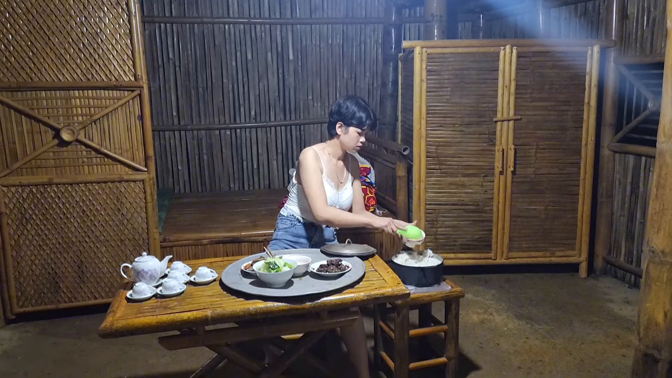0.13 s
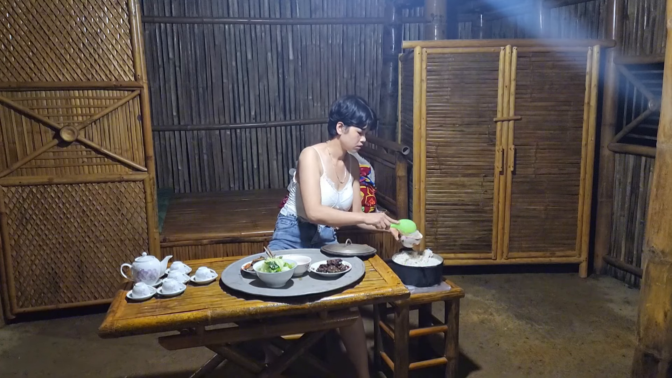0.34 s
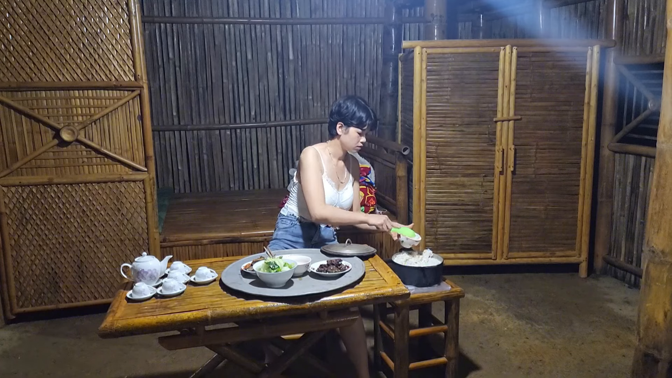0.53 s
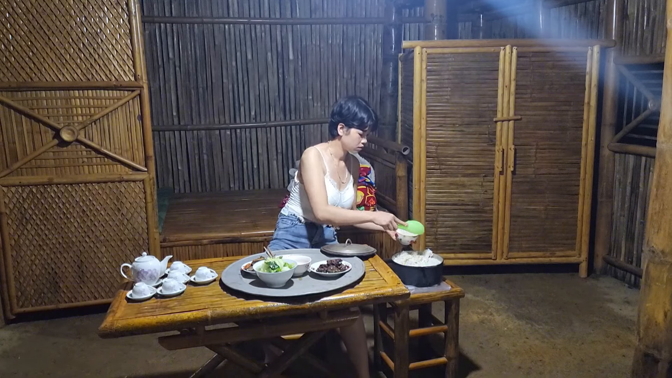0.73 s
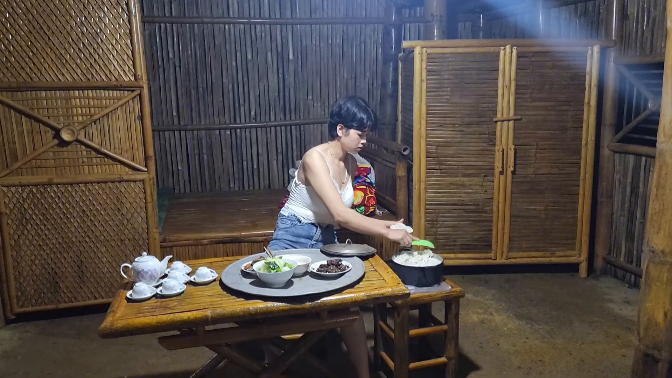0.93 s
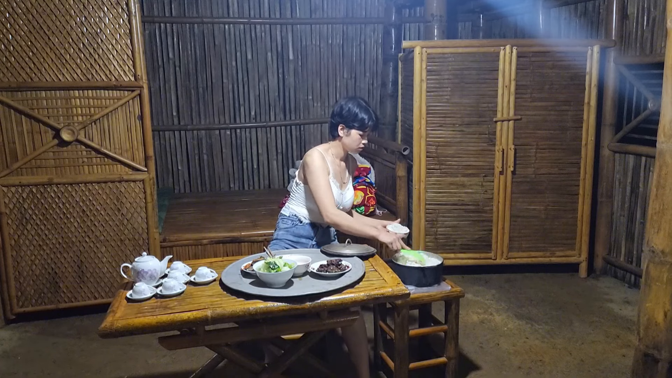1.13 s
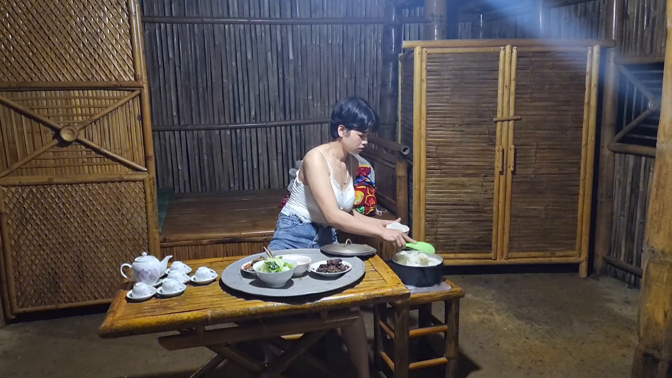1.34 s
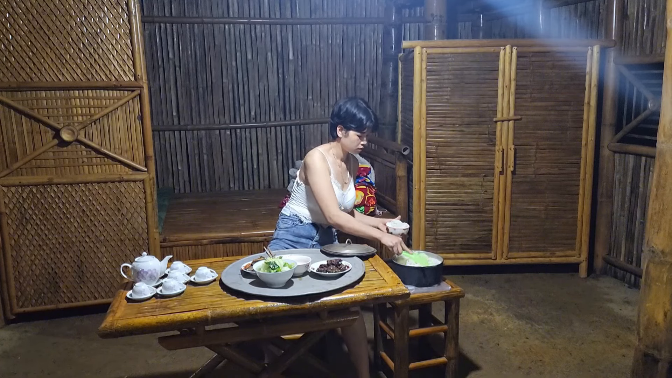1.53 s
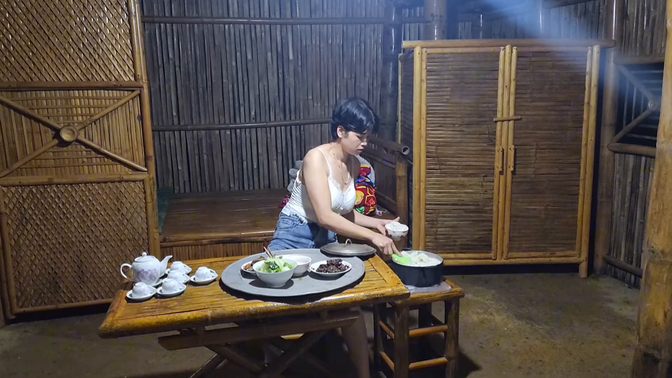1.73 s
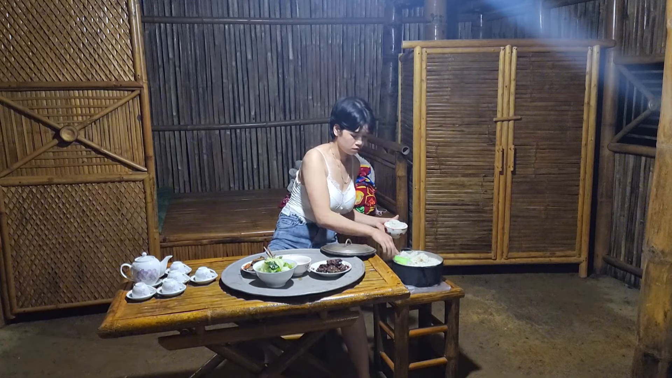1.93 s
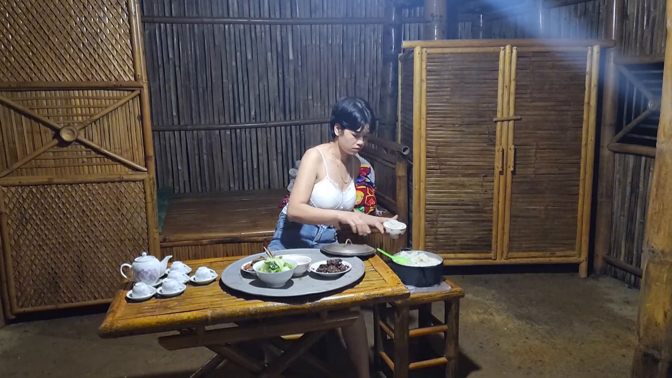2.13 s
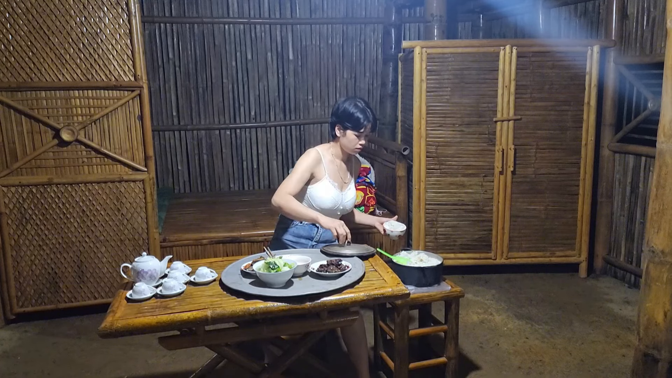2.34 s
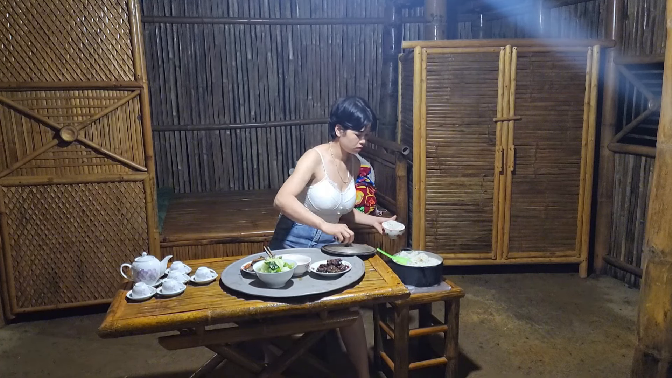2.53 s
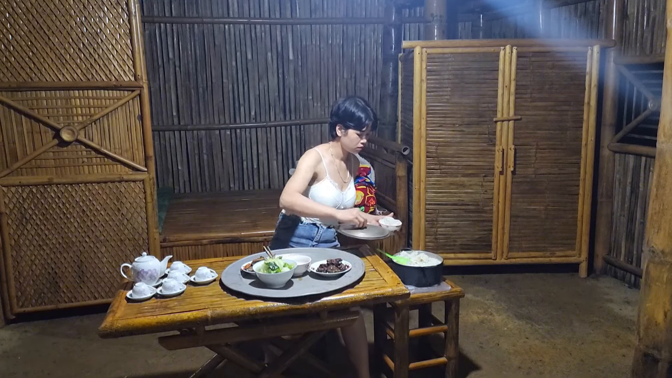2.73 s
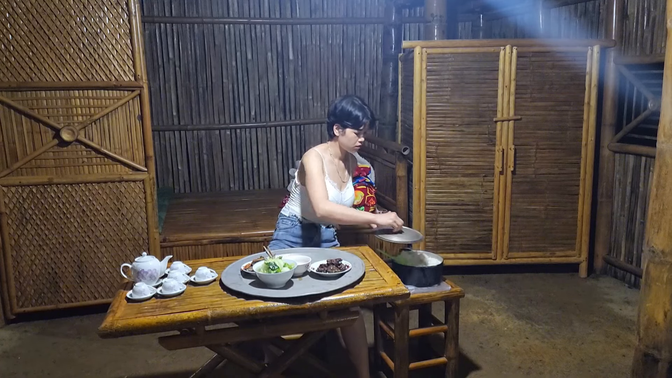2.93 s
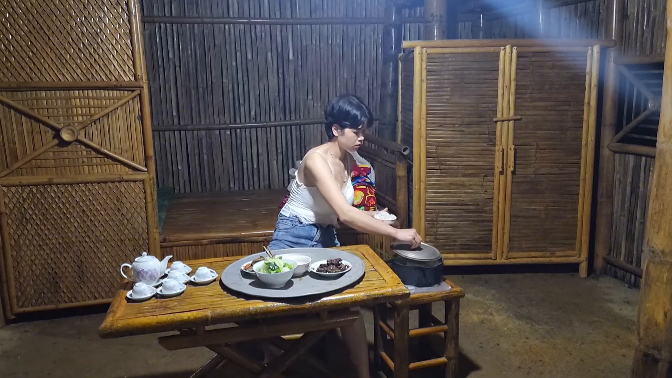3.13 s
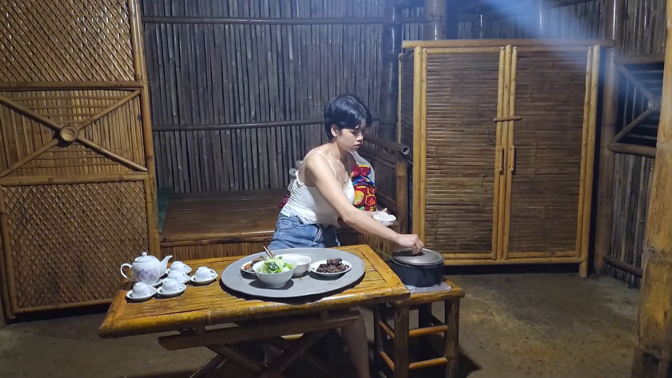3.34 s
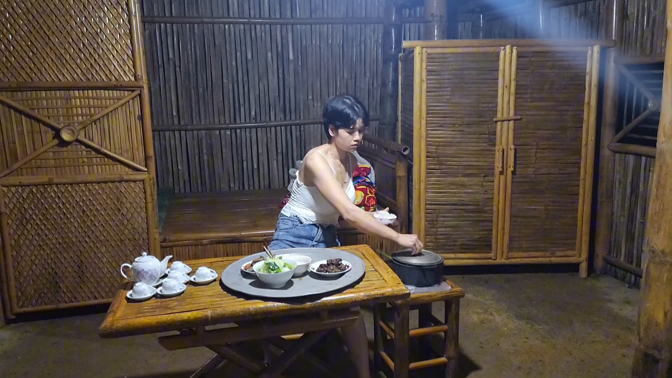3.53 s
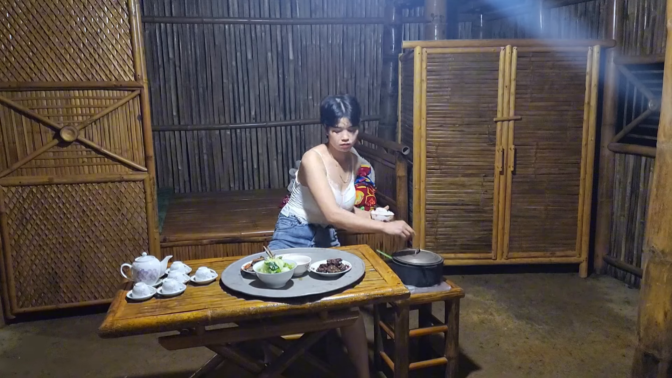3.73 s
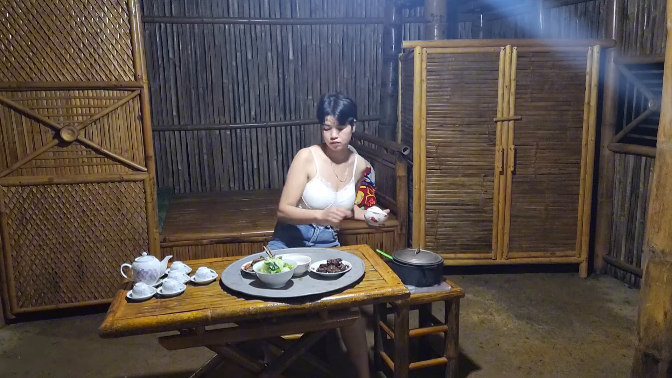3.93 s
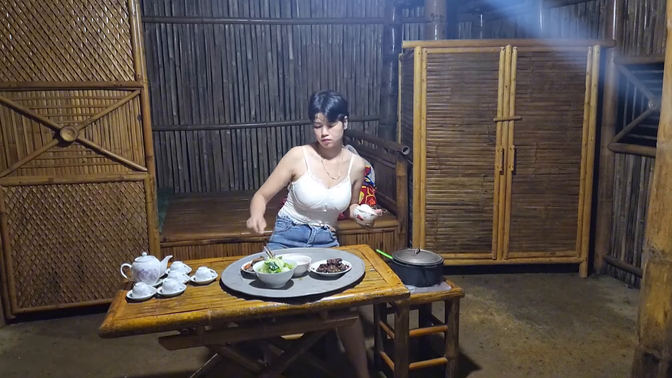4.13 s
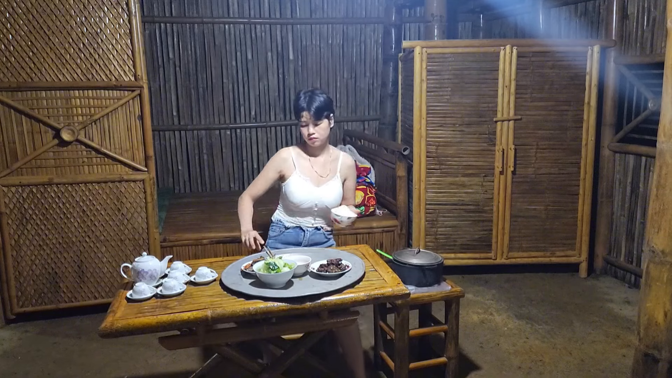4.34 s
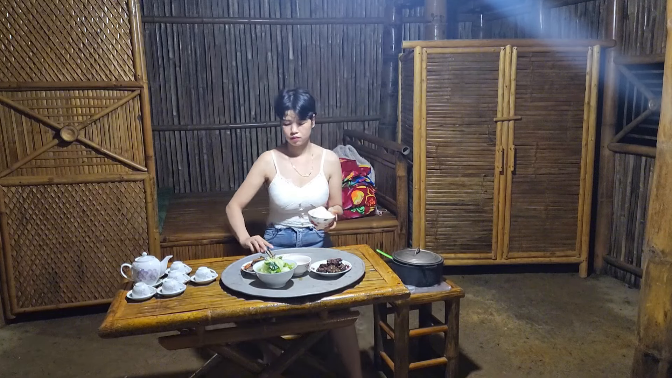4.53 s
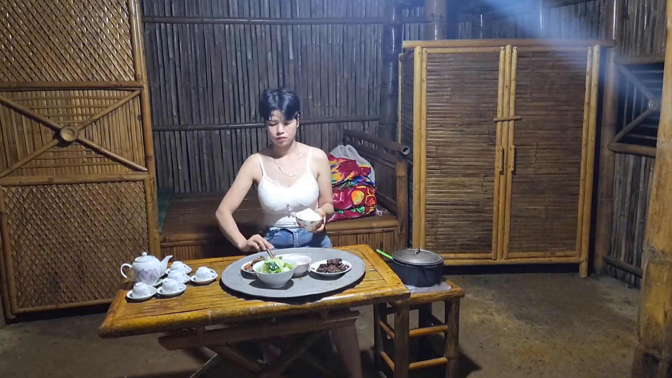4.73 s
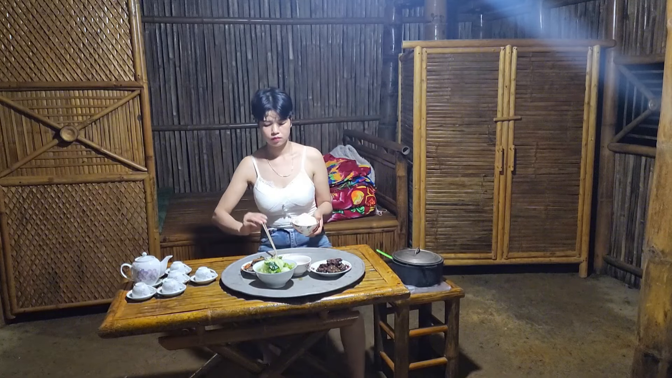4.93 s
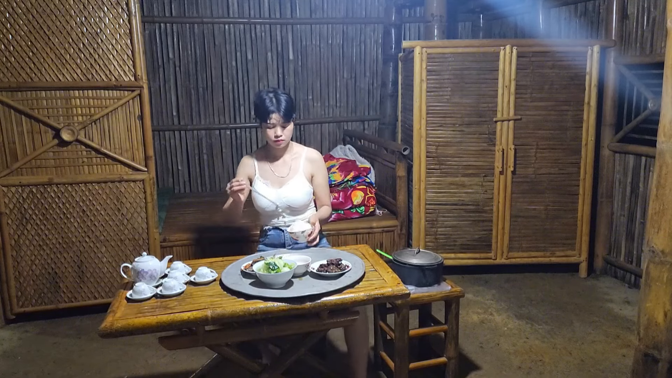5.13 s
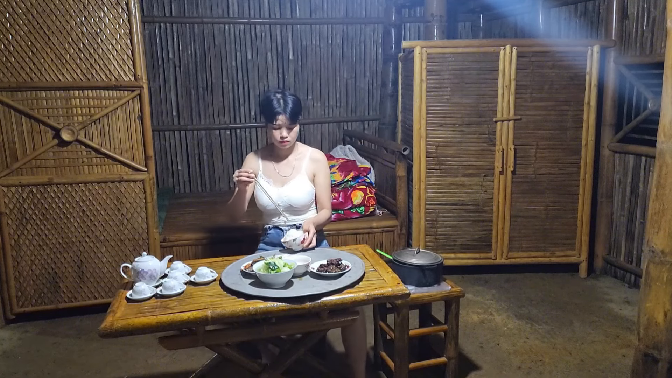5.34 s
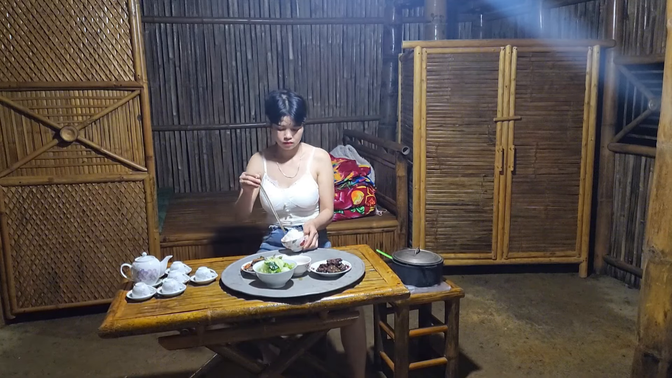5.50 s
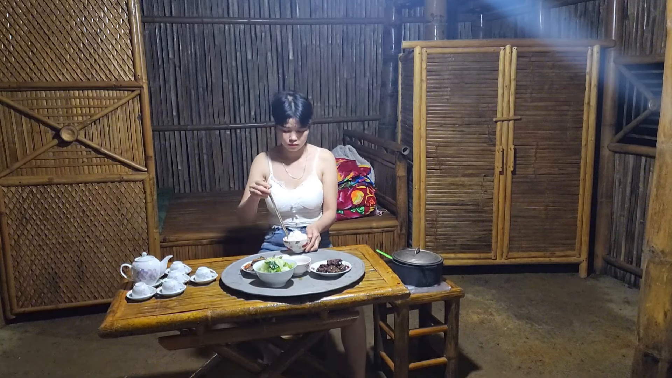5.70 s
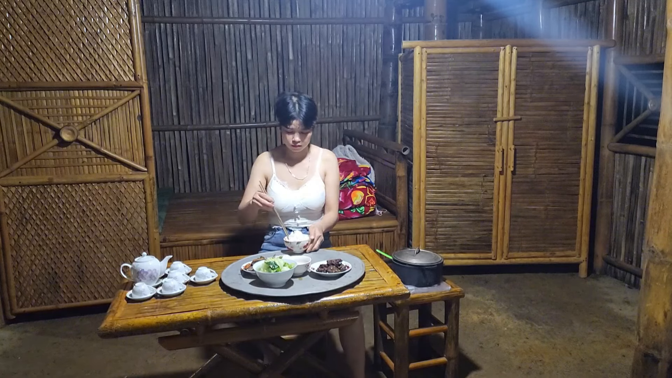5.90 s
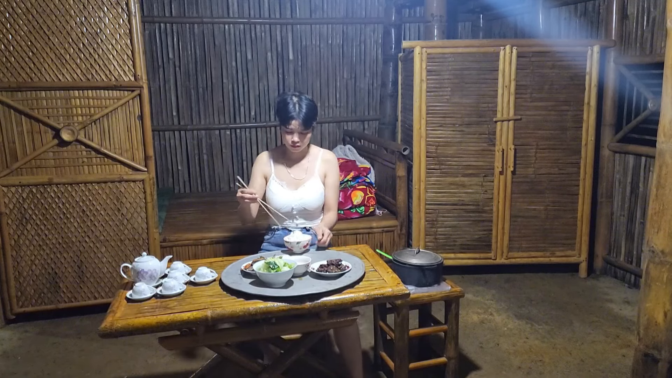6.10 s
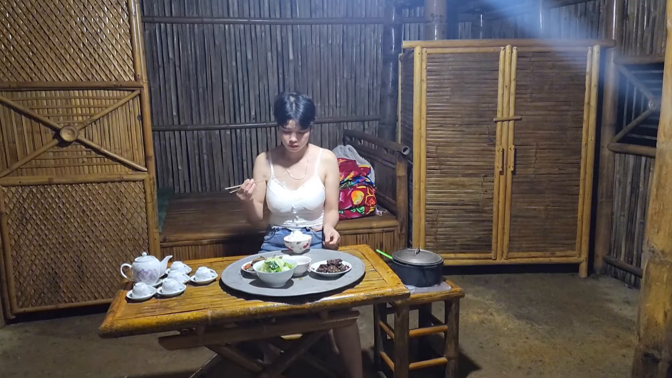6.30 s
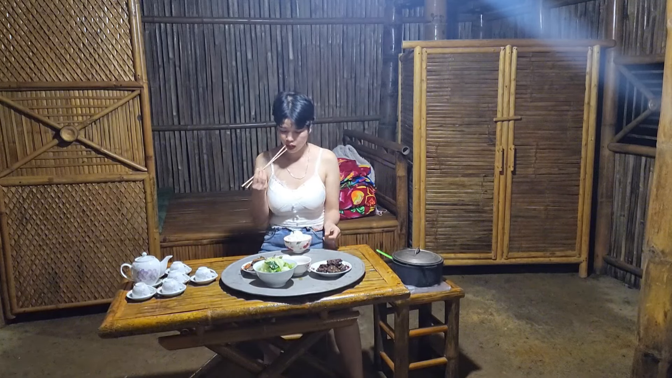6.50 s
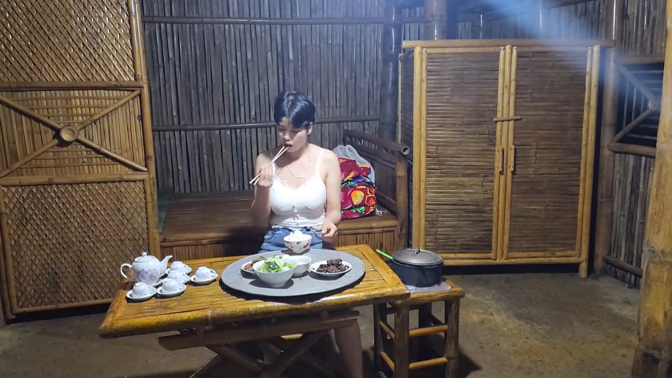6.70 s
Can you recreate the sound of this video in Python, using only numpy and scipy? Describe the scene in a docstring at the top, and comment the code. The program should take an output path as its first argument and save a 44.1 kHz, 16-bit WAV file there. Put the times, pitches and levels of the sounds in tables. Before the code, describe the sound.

A quiet meal in a slatted hut at night, heard in stereo from across the room with a short, dense echo. Continuous pulsing crickets, slightly to the right, and a thin insect chorus lie over soft air noise. Small bowl taps and a pot knock come first, then a chattering metal lid and its bright double clang, the loudest event. Chopsticks rustle and click against china, and finally a dish bumps the tray with a low ring.

```python
"""Night in a bamboo hut: crickets chirp outside over a steady chorus of trilling insects and soft air noise.
A paddle taps a bowl and knocks on a rice pot; the metal lid is dragged off the table, swung and set on the pot.
A soft bump on the bench follows, chopsticks are picked up, and a dish is bumped on the serving tray.
Wing strokes are short gliding tones, contacts are filtered noise bursts with decaying modes, and scrapes
are clumped noise. The hut's short, dense echo is noise that decays band by band."""
import sys
import numpy as np
from scipy import signal
from scipy.fft import rfft, irfft
from scipy.io import wavfile
from scipy.ndimage import uniform_filter1d

SR = 44100
rng = np.random.default_rng(int(sys.argv[2]) if len(sys.argv) > 2 else 0)


def transcribe(u):
    """Save the signal u as a 16-bit wav file named by the first command-line argument.

    u: samples, shape (n,) or (channels, n), limited to [-1, 1]; the rate is SR.
    q: integer samples, one column per channel.
    """
    v = np.clip(np.atleast_2d(u).T, -1, 1)
    q = np.round(v * 32767).astype(np.int16)
    wavfile.write(sys.argv[1], SR, q)


N = 302526

# Correlation of the two microphones. Each row: frequency in Hz, correlation from -1 to 1.
LIKENESS = [(25, 0.031), (70, 1), (300, 0.8), (700, 0.22), (1400, 0)]
# Reverberation of the hut. Each row: frequency in Hz, 60 dB decay time in seconds.
HUT_DECAY = [(150, 0.31), (400, 0.29), (1000, 0.28), (2800, 0.31), (7000, 0.29), (14000, 0.21)]
# Modes of the china bowl. Each row: frequency in Hz, relative level in dB, 60 dB decay time in seconds.
BOWL_MODES = [(1320, -8, .14), (1949, 0, .29), (2169, -5, .22), (2540, -12, .2)]
# Modes of the pot struck on its rim. Each row: frequency in Hz, relative level in dB, 60 dB decay time in seconds.
POT_MODES = [(571, -10, .25), (611, -11, .25), (665, -12, .25), (1180, -13, .17), (1289, -13, .17),
             (1909, -8, .2), (1995, -8, .2), (2076, -8, .3), (2705, -6, .3), (3085, -7, .27),
             (3680, -12, .15), (3890, -10, .15), (4340, -1, .2), (4360, 0, .23), (4590, -10, .17),
             (5110, -11, .17), (5385, -8, .22), (5520, -9, .17), (6250, -9, .2), (6915, -11, .22),
             (7380, -10, .23), (7529, -12, .2), (8870, -12, .2), (10540, -25, .25), (11930, -25, .17)]
# Modes of the lid held free. Each row: frequency in Hz, relative level in dB, 60 dB decay time in seconds.
FREE_LID_MODES = [(1680, -1, 0.28), (1774, 9, 0.065), (4080, -7.5, .2), (5700, -9, 0.21),
                  (7380, -7.5, 0.17), (11260, -24, 0.17)]


def amp(db):
    """Level and amplitude: decibels become a linear gain."""
    return 10 ** (np.asarray(db) / 20)


def evened(x):
    """Normalization: the signal is scaled to an rms of one."""
    return x / np.sqrt(np.mean(x ** 2) + 1e-20)


def read(points, hz):
    """Interpolation on a logarithmic frequency axis."""
    f, value = np.transpose(points)
    return np.interp(np.log(hz + 1), np.log(f + 1), value)


def add(mix, s, sound):
    """Superposition: a sound is summed into the mix from time s in seconds, cut at the mix's ends."""
    start = round(s * SR)
    sound = sound[..., max(-start, 0):]
    part = mix[..., max(start, 0):][..., :sound.shape[-1]]
    part += sound[..., :part.shape[-1]]


def panned(db):
    """Intensity stereo: left-minus-right decibels are split into a pair of gains."""
    return amp([[db / 2], [-db / 2]])


def paired(x):
    """Spatial coherence: two unrelated signals are mixed to the microphones' correlation at each frequency."""
    z = rfft(x)
    correlation = np.clip(read(LIKENESS, np.fft.rfftfreq(x.shape[1], 1 / SR)), -1, 1)
    angle = np.arcsin(correlation) / 2
    return irfft(np.cos(angle) * z + np.sin(angle) * z[::-1], x.shape[1])


def wander(rate_hz):
    """Slow random modulation: Gaussian low-passed noise of rms one."""
    hz = np.fft.rfftfreq(N, 1 / SR)
    spectrum = rfft(rng.standard_normal(N)) * np.exp(-(hz / rate_hz) ** 2)
    return evened(irfft(spectrum, N))


def bass_share(hz, bass_hz=550):
    """Contact mass: the weight of a bass boost falls from one towards zero with frequency."""
    return 1 / (1 + (hz / bass_hz) ** 4)


def nearness(modes, hz, width_hz=45, width_share=0.012):
    """Resonance: one on any of the modes, near zero in the valleys between them."""
    centre = np.array(modes)[:, :1]
    return np.exp(-((hz - centre) / (width_hz + width_share * centre)) ** 2).max(0)


def colour(x, spectrum, bass_db, treble_db, modes=None, gather_db=0, treble_hz=3600, size=2048):
    """Minimum-phase filtering: a body's spectrum, raised at its modes, tilted by contact mass and hardness."""
    hz = abs(np.fft.fftfreq(size, 1 / SR))
    treble_share = 1 - 1 / (1 + (hz / treble_hz) ** 4)
    db = read(spectrum, hz) + bass_db * bass_share(hz) + treble_db * treble_share
    if modes is not None:
        db = db + gather_db * nearness(modes, hz)
    # the Hilbert transform of the log magnitude gives the causal phase
    log_response = np.conj(signal.hilbert(np.log(amp(db))))
    impulse_response = np.fft.ifft(np.exp(log_response)).real
    return signal.fftconvolve(x, impulse_response)


def echoes(t60s, direct_db, build_s, lag_s=0):
    """Reverberation: a direct pulse, later at the left by lag_s, then dense reflections dying band by band."""
    count = SR // 2
    # random signs at about 5000 reflections per second
    reflections = rng.choice([-1., 1.], (2, count)) * (rng.random((2, count)) < 5000 / SR)
    hz, t, z = signal.stft(paired(reflections), SR, nperseg=256)
    decay = amp(-60 * t / read(t60s, hz)[:, None])
    tail = signal.istft(z * decay, SR, nperseg=256)[1][:, :count]
    tail = tail * (1 - np.exp(-np.arange(count) / SR / build_s))
    tail /= np.linalg.norm(tail, axis=1, keepdims=True)
    direct = amp(direct_db) * np.hanning(7) / 3  # partly shaded, so without its top treble
    add(tail[0], max(lag_s, 0), direct)
    add(tail[1], max(-lag_s, 0), direct)
    return tail / np.linalg.norm(tail, axis=1, keepdims=True)


def heard(x, response):
    """Linear propagation: the sound is convolved with a stereo impulse response."""
    return signal.fftconvolve(x[None], response, axes=1)[:, :N]


def air(level_db=-62.0, drift_db=1.5):
    """Broadband noise: the soft wash of the still night, its level drifting at random."""
    # Each row: frequency in Hz, relative spectral density in dB.
    air_spectrum = [(25, -8), (60, -17), (100, -12), (135, 0.5), (185, 0.5), (260, -7), (600, -4),
                    (1000, -5.5), (2000, -5), (3400, -10.5), (5000, -20), (7500, -17), (10000, -29),
                    (15500, -34.5)]
    noise = rfft(paired(rng.standard_normal((2, N))))
    gain = amp(read(air_spectrum, np.fft.rfftfreq(N, 1 / SR)))
    wash = evened(irfft(noise * gain, N))
    return wash * amp(level_db + drift_db * wander(9))


def chorus(throb=0.092, drift_db=-1.0):
    """Incoherent summation: many far insects merge into narrow, fluttering bands of noise."""
    # Each row: centre in Hz, nominal width in Hz, level in dB, left-right difference in dB,
    # mean pulses per second.
    trill_bands = [(4220, 430, -68.5, -1, 21), (6030, 880, -71, -1, 50), (6747, 280, -68, -0.5, 94)]
    f, out = np.fft.rfftfreq(N, 1 / SR), np.zeros((2, N))
    for hz, width, db, pan_db, pulse_hz in trill_bands:
        band_gain = 1 / (1 + (0.99 * (f - hz) / width) ** 2) ** 1.5
        band = irfft(rfft(rng.standard_normal((2, N))) * band_gain, N)
        pulse_rate = pulse_hz * (1 + 0.19 * wander(10))
        flutter = 1 + throb * np.sin(2 * np.pi * np.cumsum(pulse_rate) / SR)
        out += evened(band * flutter) * amp(db + drift_db * wander(6.1)) * panned(pan_db)
    return out


def near_bout(count=18):
    """Rhythm of one bout: gaps shrink to the quickest chirp, then widen, while the level grows steadily."""
    start_s, first_gap_s, quickest_gap_s, quickest_chirp = -.039, .2709, .2335, 13
    start_db, growth_db_per_s, length_s = -54.5, 0.5, 0.13
    ease = (1 - np.arange(count - 1) / quickest_chirp) ** 2
    gaps = quickest_gap_s + (first_gap_s - quickest_gap_s) * ease
    times = start_s + np.cumsum([0, *gaps])
    return [(s, start_db + growth_db_per_s * s, length_s) for s in times]


def high_bout(count=11):
    """Periodic rhythm: a higher-pitched neighbour gives long, like chirps on its own slower, even beat."""
    start_s, gap_s, db, length_s = -.155, .377, -56, 0.18
    return [(start_s + k * gap_s, db, length_s) for k in range(count)]


def stray_chirps(length_s=.18):
    """Irregular rhythm: stray chirps from other crickets, as long as the high neighbour's."""
    # Each row: start in seconds, level in dB.
    strays = [(0.491, -62), (0.841, -59.5), (1.621, -57.5), (2.369, -61.5), (4.098, -61.5), (5.555, -60.5),
              (6.445, -56), (6.775, -64)]
    return [(s, db, length_s) for s, db in strays]


def cricket(chirps, start_hz, top_hz, glide_s, pulse_hz, swell, sag_hz, uneven_db=3.0, waver_hz=30):
    """Stridulation: each wing stroke is a short tone of its own strength; strokes climb as the chirp swells."""
    out = np.zeros(N)
    for s, db, length in chirps:
        t = np.arange(0, length, 1 / SR)
        force, tune = rng.standard_normal((2, 20))
        turns = t * pulse_hz * (1 + 0.038 * tune[-1])  # each chirp has its own stroke rate
        which, stroke = turns.astype(int) % len(force), turns % 1
        climb = top_hz + (start_hz - top_hz) * np.exp(-t / glide_s)
        hz = climb + sag_hz * (.5 - stroke) + waver_hz * tune[which]
        arch = np.sin(np.pi * (t / length) ** swell) ** 0.7 * amp(uneven_db * force[which])
        tone = np.sin(2 * np.pi * np.cumsum(hz) / SR)
        add(out, s, amp(db) * evened(arch * np.sin(np.pi * stroke) * tone))
    return out


def crickets():
    """Multipath: chirps come in from the right through the slatted walls, smeared by reflections."""
    near = cricket(near_bout(), start_hz=3765, top_hz=4260, glide_s=0.031, pulse_hz=64.8,
                   swell=0.6, sag_hz=70)
    high = cricket(high_bout(), start_hz=4170, top_hz=4670, glide_s=0.05, pulse_hz=73.8,
                   swell=0.39, sag_hz=110)
    others = cricket(stray_chirps(), start_hz=4160, top_hz=4740, glide_s=0.06, pulse_hz=62,
                     swell=0.64, sag_hz=110)
    out = np.zeros((2, N))
    for voice, direct_db in ((near, 1.5), (high, -6), (others, -6)):
        wet = heard(voice, echoes([(4000, 0.66)], direct_db, build_s=0.00067, lag_s=0.00042))
        out += wet * voice.std() / wet.std(axis=1, keepdims=True)
    return out * amp([[-.9], [.6]])


def bench():
    """Single-mode excitation: a padded contact stirs one low tone of the wood, alike in both microphones."""
    # The row: time of its height in seconds, half length in seconds, pitch in Hz, level in dB.
    bump = (4.158, 0.06, 183.5, -61)
    s, half, hz, db = bump
    out, t = np.zeros(N), np.arange(0, 2 * half, 1 / SR)
    add(out, s - half, amp(db) * np.hanning(len(t)) * np.sin(2 * np.pi * hz * t))
    return out


def rubbing(count, chatter):
    """Stick-slip friction: noise whose strength varies every few ms as two surfaces catch and slip."""
    push, grip = rng.standard_normal((2, count))
    slow_grip = evened(uniform_filter1d(grip, size=80))
    return push * np.exp(chatter * np.tanh(slow_grip))


def scrapes(grit=0.82, chatter=0.88):
    """Sliding friction on wood and china: tiny slips crowd into uneven clumps under each stroke's swell."""
    # Each row: time of the stroke's height in seconds, half length in seconds, level in dB,
    # bass tilt in dB, treble tilt in dB.
    strokes = [(2.889, 0.066, -52, 5, 9.5), (4.682, 0.12, -57, -29, 13.5), (4.858, 0.074, -66.5, 14, 5),
               (5.118, 0.087, -63, 7, -8), (5.213, 0.087, -52.3, -4.5, 0.5)]
    # Each row: frequency in Hz, relative level in dB.
    scrape_spectrum = [(40, -38), (100, -6), (250, -6), (450, 8), (700, -4.5), (1350, 3.5), (2200, 1.5),
                       (3200, -3.5), (4500, -6.5), (7000, -17), (10000, -20), (15000, -24)]
    out = np.zeros(N)
    for s, half, db, bass_db, treble_db in strokes:
        push = rubbing(SR // 2, chatter) * np.exp(grit * rng.standard_normal(SR // 2))
        push = push[:int(2 * half * SR)]
        slips = colour(push * np.hanning(len(push)), scrape_spectrum, bass_db, treble_db)
        add(out, s - half, amp(db) * evened(slips))
    return heard(out, echoes(HUT_DECAY, direct_db=-5.0, build_s=0.0011))


def knocks(hits, spectrum, modes, pan_db, direct_db, ring_rise_s, gather_db, shimmer=None,
           chatter=0.56, snap=0.35, twin=0.63, split=0.0048):
    """Impact and modal decay: a snap and brief chatter, coloured by the modes, which ring on beside it.

    Each hit: start in seconds, level in dB, bass tilt in dB, treble tilt in dB,
    60 dB decay of the contact in seconds, gain of the ringing modes in dB."""
    out, t = np.zeros((2, N)), np.arange(int(.7 * SR)) / SR
    hz, mode_db, t60 = np.transpose(modes)[:, :, None]
    # low modes reach both microphones in step, high ones out of step
    apart = 2.2 * rng.uniform(-1, 1, hz.shape) * np.clip(1 - read(LIKENESS, hz), 0, 1)
    rings = amp(mode_db - 60 * t / t60) * np.exp(2j * np.pi * hz * t) * (1 - np.exp(-t / ring_rise_s))
    # nothing is quite round: unless twin is 0, each mode beats with a weaker one just beside it
    beat_hz = split * hz * rng.uniform(-1, 1, hz.shape)
    rings = rings * (1 + twin * 1j * np.exp(2j * np.pi * beat_hz * t))
    for s, db, bass_db, treble_db, contact_t60, ring_db in hits:
        push = rubbing(SR // 4, chatter) * amp(-60 * t[:SR // 4] / contact_t60)
        push[0] = snap * np.linalg.norm(push[:SR // 200])
        response = echoes(HUT_DECAY, direct_db, build_s=0.00063, lag_s=-.00007)
        if shimmer is not None:
            add(response, .002, shimmer)
        sound = heard(colour(push, spectrum, bass_db, treble_db, modes, gather_db), response)
        loudness = np.sqrt(np.mean(sound[:, :SR // 20] ** 2))  # over the first 50 ms
        add(out, s, amp(db) * sound / loudness)
        struck = rings * amp(bass_db * bass_share(hz)) * np.exp(2j * np.pi * rng.random(hz.shape))
        left, right = struck.real.sum(0), (struck * np.exp(1j * apart)).real.sum(0)
        add(out, s, amp(ring_db) * np.array([left, right]))
    # small things radiate little deep bass
    high_pass = signal.butter(2, 85, "high", fs=SR, output="sos")
    return signal.sosfilt(high_pass, out) * panned(pan_db)


def tray_bumps():
    """Modal impact: dish and hands meet the tray, whose modes ring without beating."""
    # Each row: start in seconds, level, bass tilt and treble tilt in dB, contact decay in seconds, ring in dB.
    tray_hits = [(5.672, -38.5, -2, 5, 0.14, -47.5), (5.724, -46.5, 12, 14, 0.016, -50),
                 (5.937, -55, 8, -20, 0.26, -68), (6.06, -57.5, 10, 11, 0.045, -74),
                 (6.21, -61, 2.5, 11, 0.78, -68)]
    # Each row: frequency in Hz, relative level in dB.
    tray_spectrum = [(50, -31), (110, -7), (170, 4), (255, 8.5), (350, -3.5), (700, 0), (1800, 0),
                     (2900, -4), (4200, -14.5), (6500, -20), (9000, -30), (15000, -30.5)]
    # Each row: frequency in Hz, relative level in dB, 60 dB decay time in seconds.
    tray_modes = [(312.2, -3.3, 0.88), (409, 4.5, 0.3), (1180, -3, 0.22), (1400, 1, 0.28), (1730, -3, .14)]
    return knocks(tray_hits, tray_spectrum, tray_modes, pan_db=0.3, direct_db=-4.5,
                  ring_rise_s=0.015, gather_db=2.5, twin=0)


def chopsticks():
    """Modal impact: light sticks excite the modes of china, which build up slowly."""
    # Each row: start in seconds, level, bass tilt and treble tilt in dB, contact decay in seconds, ring in dB.
    stick_hits = [(4.9065, -47.5, -2, 2.5, 0.1, -41), (4.958, -48.5, 1.5, -15, 0.085, -48.5),
                  (5.071, -51.5, -3.5, -21, 0.015, -58), (5.226, -54, -13, -4, 0.034, -50)]
    # Each row: frequency in Hz, relative level in dB.
    stick_spectrum = [(100, -33), (270, 0), (480, -9.5), (800, 2), (1060, -9), (1350, 3.5), (2000, -4),
                      (3500, -4.5), (7000, -9), (10000, -26), (15000, -44)]
    return knocks(stick_hits, stick_spectrum, BOWL_MODES, pan_db=-1, direct_db=-11.0,
                  ring_rise_s=0.011, gather_db=5)


def bowl_taps():
    """Modal impact: a paddle tapping rice into the china bowl stirs the bowl's modes."""
    # Each row: start in seconds, level, bass tilt and treble tilt in dB, contact decay in seconds, ring in dB.
    tap_hits = [(.739, -47, -2, -7, 0.042, -52.5), (.787, -55, -8, 19, 0.03, -64)]
    # Each row: frequency in Hz, relative level in dB.
    tap_spectrum = [(350, -26), (750, -7), (1150, 2.5), (1600, -5.5), (2500, -11), (4000, -11),
                    (15000, -51)]
    return knocks(tap_hits, tap_spectrum, BOWL_MODES, pan_db=1.5, direct_db=0,
                  ring_rise_s=0.0017, gather_db=7.5)


def paddle_knocks():
    """Modal impact: the paddle knocks on the pot and stirs the pot's modes."""
    # Each row: start in seconds, level, bass tilt and treble tilt in dB, contact decay in seconds, ring in dB.
    paddle_hits = [(1.3235, -40.5, 6.5, 14, 0.037, -52), (2.2495, -49.5, 15, 4, 0.06, -67)]
    # Each row: frequency in Hz, relative level in dB.
    paddle_spectrum = [(100, -37), (430, -19.5), (590, -5), (900, -2.5), (1200, -5.5), (2000, 1.5),
                       (3500, -7), (6000, -16), (9000, -27.5), (15000, -50)]
    return knocks(paddle_hits, paddle_spectrum, POT_MODES, pan_db=0.0, direct_db=-3.5,
                  ring_rise_s=0.0084, gather_db=3.5)


def sheet_metal(t60=0.18, low_hz=6000, span_hz=9500, count=28):
    """High modal density: the fine high modes of thin pressed metal, as a stereo response."""
    t = np.arange(SR // 3) / SR
    hz = low_hz + span_hz * (np.arange(count) + rng.random(count))[:, None] / count
    tones = np.sin(2 * np.pi * (hz * t + rng.random((2, count, 1))))
    ring = tones.sum(1) * amp(-60 * t / t60)
    return ring / np.linalg.norm(ring, axis=1, keepdims=True)


def lid_drag(metal):
    """Repeated impact: the lid chatters off the table, stirring its free modes and the shimmer of its sheet."""
    # Each row: start in seconds, level, bass tilt and treble tilt in dB, contact decay in seconds, ring in dB.
    lift_hits = [(2.902, -37, 5.5, 3, 0.096, -56), (2.933, -38.5, -9.5, -8, 0.13, -43),
                 (2.958, -44, -2, -3, 0.05, -39), (2.989, -42, 1, 5, 0.054, -60),
                 (3.025, -48.5, -4, -9, 0.092, -42.5), (3.054, -54, 6, 8, .03, -54),
                 (3.11, -53.5, -4.5, -1, 0.12, -56), (3.163, -57, -11, -11, 0.043, -54),
                 (3.186, -54, -1.5, 5.5, 0.05, -52)]
    # Each row: frequency in Hz, relative level in dB.
    lift_spectrum = [(50, -38), (120, 2), (180, -3.5), (380, 9.5), (550, -4), (800, 2.5), (1100, -3),
                     (1700, 1.5), (2600, -3.5), (4200, -5.5), (7000, -14), (10000, -20), (15000, -25)]
    return knocks(lift_hits, lift_spectrum, FREE_LID_MODES, pan_db=-0.5, direct_db=-3.5,
                  ring_rise_s=0.0021, gather_db=4.5, shimmer=amp(-5.5) * metal, chatter=2.3)


def swung_lid(db=-51.0):
    """Directivity: the free lid's lowest mode swells once more as its face turns towards the microphone."""
    t = np.arange(N) / SR
    swell = np.exp(-((t - 3.26) / .072) ** 2)  # height and spread in seconds
    return amp(db) * swell * np.sin(2 * np.pi * FREE_LID_MODES[0][0] * t)


def lid_set_down(metal):
    """Coupled resonance: the lid clangs onto the pot, its contact gathered strongly around the pot's modes."""
    # Each row: start in seconds, level, bass tilt and treble tilt in dB, contact decay in seconds, ring in dB.
    lid_hits = [(3.607, -31.5, -5, 5.5, 0.016, -32), (3.621, -43, -9, 20, 0.018, -38),
                (3.686, -41.5, -11.5, 2.5, 0.11, -41.5), (3.7365, -34, -0.5, 3.5, 0.027, -47),
                (3.759, -37.5, 2.5, 6.5, 0.022, -46)]
    # Each row: frequency in Hz, relative level in dB.
    lid_spectrum = [(60, -20), (150, -6), (240, -6), (340, 4), (620, 4), (950, -5), (2400, 0), (3400, -5),
                    (4850, -6.5), (7400, -15), (9800, -23.5), (15000, -37)]
    return knocks(lid_hits, lid_spectrum, POT_MODES, pan_db=-0.5, direct_db=-5,
                  ring_rise_s=0.00068, gather_db=10.5, shimmer=amp(-4) * metal)


def scene():
    """Superposition: the insects outside and the meal inside."""
    metal = sheet_metal()
    night = air() + chorus() + crickets()
    table = bench() + scrapes() + tray_bumps() + chopsticks() + bowl_taps()
    pot_and_lid = paddle_knocks() + lid_drag(metal) + swung_lid() + lid_set_down(metal)
    return night + table + pot_and_lid


def record(dry, edge_hz=15900):
    """Band limiting: a linear-phase low-pass removes the top treble."""
    low_pass = signal.firwin(511, edge_hz, window=("kaiser", 9), fs=SR)
    return signal.oaconvolve(dry, low_pass[None], "same")


dry = scene()
out = record(dry)
transcribe(out)
```